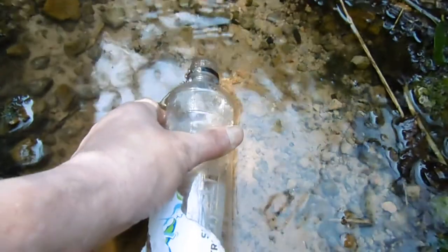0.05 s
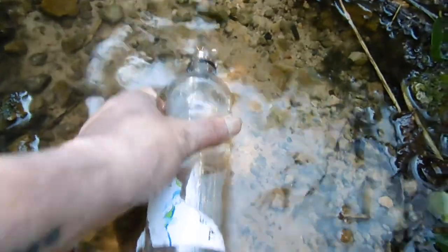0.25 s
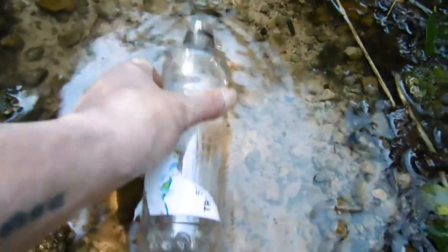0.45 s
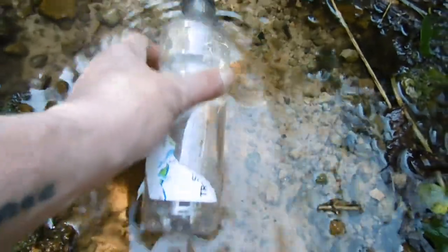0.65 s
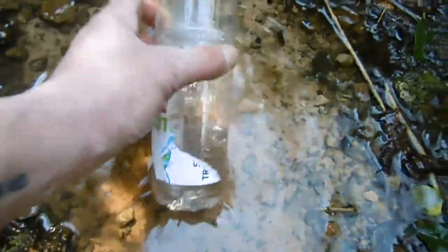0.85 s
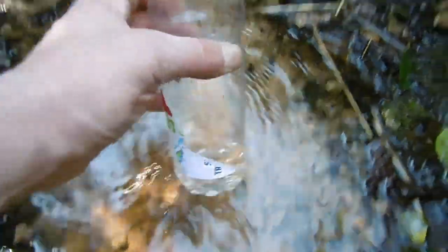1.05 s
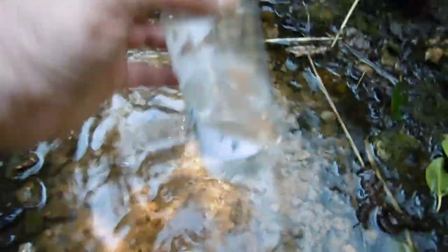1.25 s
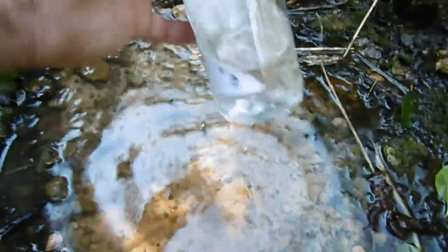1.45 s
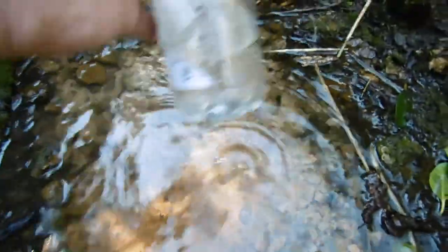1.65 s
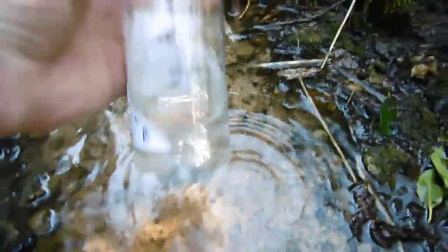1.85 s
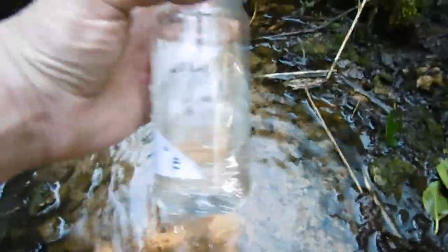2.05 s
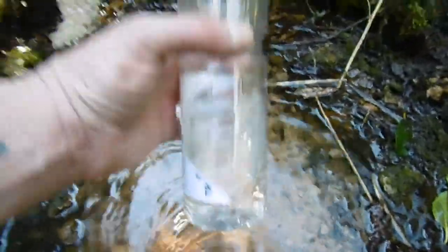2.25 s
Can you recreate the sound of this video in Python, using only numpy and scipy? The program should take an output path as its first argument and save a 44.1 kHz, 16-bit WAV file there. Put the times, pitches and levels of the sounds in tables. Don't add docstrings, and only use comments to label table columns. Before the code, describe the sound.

Water splashing in a plastic bottle: small bubbly spatters from 0.1 s, growing at 0.3 s, strongest at about 0.5-0.65 s as it leaves the stream, with hollow plops and slosh, a last splash at 0.8 s. Then quiet hiss and trickle, faint drips near 1 and 1.9 s. A distant bird whistles thinly from 0.9 s, busier after 1.9 s. Close, dull small microphone outdoors.

```python
import sys
import numpy as np
from scipy import signal
from scipy.fft import rfft, irfft
from scipy.io import wavfile
from scipy.ndimage import uniform_filter1d

SR = 44100
rng = np.random.default_rng(int(sys.argv[2]) if len(sys.argv) > 2 else 0)


def wav_out(sig):
    wavfile.write(sys.argv[1], SR, np.round(np.clip(np.atleast_2d(sig).T, -1, 1) * 32767).astype(np.int16))


def undo_db(level):
    steps = np.asarray(level, float) / 20
    return 10 ** steps


N = 99225


def evened(x):
    return x / np.sqrt(np.mean(x ** 2) + 1e-20)


def read(points, hz):
    point_hz, level_db = np.transpose(points)
    return np.interp(np.log(hz + 1), np.log(point_hz + 1), level_db)


def add(mix, start_s, sound):
    part = mix[round(start_s * SR):][:len(sound)]
    part += sound[:len(part)]


def bubble(hz, cycles, chirp):
    cycle = np.arange(1200) * hz / SR
    envelope = (1 - np.exp(-cycle / 0.43)) * np.exp(-3 * cycle / cycles)
    tone = envelope * np.sin(2 * np.pi * cycle * (1 + chirp * cycle / cycles))
    return tone / np.linalg.norm(tone)


def bubbles(colour, per_s, level_at, count=36):
    size_spread_db = 2.2
    out = np.zeros(N)
    for hz in np.geomspace(220, 8300, count):
        when, big = rng.random(N), rng.exponential(1, N)
        born = when < per_s / count / SR * np.sqrt(hz / 2000)
        train = born * undo_db(size_spread_db * np.minimum(big, 4))
        drive = evened(train - train.mean()) * level_at(hz) * np.sqrt(hz)
        ringing = signal.oaconvolve(drive, bubble(hz, cycles=5, chirp=0.07))[:N]
        out += undo_db(read(colour, hz)) * ringing
    return out


# pitch_hz [Hz], level_db [dB per Hz]
STREAM_SPECTRUM = [(12, -45.5), (24, -2), (55, -4.5), (158, -9), (198, -11), (421, -15.5), (465, -13.5),
                   (6700, -19), (8200, -23), (10700, -52), (18000, -120)]


def stream():
    hiss_db, trickle_db, patchy_db = -58, -70, 1.6
    frames, hz = N // 512 + 5, np.fft.rfftfreq(2048, 1 / SR)
    real, imaginary, patches = rng.standard_normal((frames, 1025, 3)).T
    patches = uniform_filter1d(patches, 24, 0)
    patches = evened(uniform_filter1d(patches, 5, 1))
    patches_db = patchy_db * patches * np.minimum(hz / 400, 1)[:, None]
    spectrum = (real + 1j * imaginary) * undo_db(read(STREAM_SPECTRUM, hz)[:, None] + patches_db)
    hiss = signal.istft(spectrum, nperseg=2048, noverlap=1536)[1][:N]
    trickle = bubbles(STREAM_SPECTRUM, per_s=1300, level_at=lambda hz: 1, count=20)
    return undo_db(hiss_db) * evened(hiss) + undo_db(trickle_db) * evened(trickle)


def resonate(x, hz, width_hz):
    turn = np.exp(2j * np.pi * np.cumsum(hz) / SR)
    pole = np.exp(-np.pi * width_hz / SR)
    return 2 * (turn * signal.lfilter([1 - pole], [1, -pole], x / turn)).real


# [dB, high bubbles]
SPLASHES = [(0.098, 0.033, -59.5, 7, 4.5), (0.116, 0.018, -51, -5.5, -1.5),
            (0.136, .03, -50.5, -1.5, 3.5), (0.167, 0.031, -50, 5.5, -2), (.192, .004, -46, 5, -5),
            (0.195, .026, -54.5, 2.5, -1), (0.225, 0.044, -50.5, 2.5, -6.5),
            (.259, .008, -48, -5, -4.5), (.267, 0.014, -44, 0, -3.5), (0.279, 0.0061, -42, -3, -1),
            (.285, .011, -39.5, 3, -1.5), (.296, 0.013, -42.5, 0, -1), (0.308, .004, -41.5, -6, 1),
            (.313, 0.017, -45, -1, -0.5), (0.328, 0.0061, -37, 0.5, -8),
            (.332, .006, -35.5, 1, -5.5), (.341, 0.0053, -34, -1, -3.5),
            (.346, 0.011, -45, 2.5, -9), (.363, 0.015, -43.5, 0, -5.5),
            (0.387, 0.023, -53.5, -7, -0.5), (0.409, .007, -52, -8, -2),
            (.416, .011, -45.5, -10, -2), (0.434, 0.025, -44.5, -4.5, -9),
            (0.445, 0.027, -43, 3, -2),
            (0.481, 0.018, -41.5, -2.5, -7), (0.493, .003, -35, -3, -2.5),
                    (0.495, 0.012, -32, -4.5, -3.5), (.506, .009, -35, -3.5, -4),
                    (0.517, 0.033, -44.5, 5, -4), (0.543, 0.01, -39, -8, 1.5), (.56, 0.0057, -36.5, -3, 4),
                    (.565, 0.0082, -43.5, 2, -2), (.572, 0.0068, -38, -0.5, 1),
                    (0.58, 0.013, -38.5, 3, -3.5), (0.59, 0.021, -36, -0.5, -6),
                    (0.608, .011, -41.5, 6, -3), (.621, .005, -34, 1, -5.5), (0.625, .006, -40, 3.5, -3),
                    (.632, 0.0078, -37, 2, -4.5), (0.64, 0.014, -40, 1, -5), (.653, .015, -50, 5, -3),
                    (.668, 0.0093, -40, -4, 1), (.683, 0.0065, -40.5, -7, -2), (.689, .007, -43.5, -4, -4),
                    (.696, 0.022, -54, 2.5, -3), (0.7194, 0.0049, -45.5, 1.5, 6.5),
                    (0.746, 0.0093, -46, 1, -9), (.759, .006, -44, -3, -3.5), (0.766, .032, -50.5, -10, -2),
                    (0.7988, .004, -36, -3.5, 0), (0.8028, .005, -40.5, -3, 1.5),
                    (.809, .013, -43, 2, -3.5), (0.82, 0.0073, -52.5, 7, -6), (0.964, 0.03, -60.5, 2, 3),
                    (1.068, 0.022, -57.5, 1, 8.5), (1.899, .004, -49, -13, -20),
                    (1.902, 0.0093, -49, -10, -20), (1.91, .008, -54.5, -15, -14),
                    (1.935, .055, -57, -18, -5)]
# pitch_hz [Hz], level_db [dB per Hz]
SPRAY_SPECTRUM = [(150, -47.5), (250, -25.5), (550, -11.5), (1400, -5), (1960, -9.5), (2600, -3.5),
                  (6980, -8.5), (8200, -38), (10700, -58.5), (18000, -120)]
# time_s [s], pitch_hz [Hz]
NECK_PITCH = [
    (0, 2660),
    (.33, 2260),
    (.42, 2050),
    (.55, 2074),
    (.7, 1985),
    (.85, 1800),
]
# pitch_hz [Hz], width_hz [Hz], level_db [dB]
WALL_MODES = [(235, 40, 8), (450, 60, 1), (545, 50, 3), (1005, 50, -3), (4900, 250, -3), (6880, 200, 3),
              (7500, 200, 2)]


def splashes():
    rise_s, sag_db, release_db_per_s = 0.003, -1.5, 3500
    clump_db, clump_s = 1.2, 0.0012
    gulp_below_hz, fizz_above_hz = 1700, 4700
    power = np.zeros((N, 3))
    for start_s, length_s, level_db, gulp_db, fizz_db in SPLASHES:
        t = np.arange(0, length_s + 0.04, 1 / SR)
        sag = sag_db * np.minimum(t / length_s, 1)
        release = release_db_per_s * np.maximum(t - length_s, 0)
        envelope = np.minimum(t / rise_s, 1) * undo_db(level_db + sag - release)
        band_gains = undo_db(np.array([gulp_db, 0, fizz_db]))
        add(power, start_s - rise_s / 2, (envelope[:, None] * band_gains) ** 2)
    clump = np.exp(-(np.arange(-400, 400) / SR / clump_s) ** 2)
    clumps = evened(signal.oaconvolve(rng.standard_normal(N), clump, "same"))
    gulp, body, fizz = np.sqrt(power.T) * undo_db(clump_db * clumps)

    def level_at(hz):
        if hz < gulp_below_hz:
            return gulp
        return fizz if hz > fizz_above_hz else body

    spray = undo_db(-45.0) * bubbles(SPRAY_SPECTRUM, per_s=24000, level_at=level_at)
    wall = np.zeros(N)
    for hz, width_hz, level_db in WALL_MODES:
        wall += undo_db(level_db) * signal.lfilter(*signal.iirpeak(hz, hz / width_hz, SR), spray)
    neck_hz = np.interp(np.arange(N) / SR, *np.transpose(NECK_PITCH))
    neck = undo_db(4.5) * resonate(spray, neck_hz, width_hz=170)
    overtone = undo_db(-3.5) * resonate(spray, 1.9 * neck_hz, width_hz=450)
    return spray + wall + neck + overtone


# start_s [s], peak_db [dB], pitch_hz [Hz], t60_s [s]
LARGE_BUBBLES = [(0.17, -41, 3600, .012), (.288, -38.5, 118.4, 0.091), (.3412, -26, 2420, 0.015),
                 (0.3409, -25, 960, 0.011), (.341, -30, 4700, 0.011), (.4872, -28.5, 1700, 0.0089),
                 (.4922, -24, 2150, 0.01), (0.5618, -26.5, 1990, 0.016), (.6209, -22.5, 1990, 0.014),
                 (.6207, -26.5, 4000, 0.011), (.6207, -29, 3900, 0.012), (0.62, -35, 1870, .04),
                 (.9765, -41, 3900, 0.012), (1.2137, -45.5, 7380, 0.017), (1.504, -50, 3370, 0.017),
                 (.4995, -19, 2310, 0.0051), (.6215, -35, 460, .045), (0.5125, -34.5, 2200, 0.025),
                 (0.547, -35.5, 1985, 0.044), (0.61, -49, 7060, .015), (0.53, -37.5, 8100, 0.006),
                 (.5945, -36, 4000, 0.018), (.684, -34.5, 1850, .02), (.284, -32, 7200, 0.0064),
                 (.143, -45, 2900, .022), (.824, -56, 1288, 0.19), (1.086, -56, 5070, .02),
                 (.5735, -34.5, 562, 0.036), (.592, -35, 482, .035), (.447, -39.5, 607, 0.029),
                 (.5535, -34, 2000, 0.011), (0.46, -29, 4160, 0.014), (.501, -37, 1290, 0.042),
                 (.5605, -35, 6900, .008), (.2852, -33, 2530, .01), (0.31, -36.5, 4600, 0.0071),
                 (.3708, -37.5, 3500, 0.0047), (.267, -39, 1050, 0.031), (0.66, -34, 2000, .015),
                 (.808, -39, 1176, .02), (0.7, -45.5, 6750, 0.017), (.8, -38, 2800, .015),
                 (1.6, -48, 28, 0.18), (.634, -43, 7900, .015), (0.26, -46, 720, .03),
                 (.288, -45, 300, 0.013), (.69, -52.5, 240, .13), (.82, -52.5, 245, .12),
                 (.605, -47, 225, 0.11), (2.1, -47, 2600, .008)]


def plops():
    rise_cycles = 1.28
    out, t = np.zeros(N), np.arange(6000) / SR
    for start_s, peak_db, hz, t60_s in LARGE_BUBBLES:
        rise = np.minimum(t * hz / rise_cycles, 1) ** 2
        decay = undo_db(peak_db - 60 * t / t60_s)
        add(out, start_s, rise * decay * np.sin(2 * np.pi * hz * t))
    return out


def echo(x, t60_s, delay_s):
    t = np.arange(SR // 2) / SR
    tail = rng.standard_normal(len(t)) * undo_db(-60 * t / t60_s) * (t > delay_s)
    return signal.fftconvolve(x, tail / np.linalg.norm(tail))[:N]


# start_s [s], length_s [s], level_db [dB], first_hz [Hz], last_hz [Hz]
BIRD_NOTES = [(0.871, 0.067, -71, 5200, 4670), (0.996, 0.027, -63, 7670, 6970),
              (1.04, .05, -79, 7630, 6850), (1.09, 0.031, -60.5, 5810, 6430),
              (1.14, 0.043, -68.5, 6280, 5720), (1.48, .02, -60, 5100, 4950), (1.5, 0.055, -67, 4830, 4260),
              (1.505, 0.038, -67, 5150, 4930), (1.595, .045, -64.5, 6210, 6200),
              (1.635, 0.041, -61, 6340, 6310), (1.662, 0.037, -67.5, 5770, 5780),
              (1.715, 0.03, -70, 5790, 5770), (1.889, .05, -66, 7750, 7380),
              (1.939, 0.047, -62.5, 6020, 5960), (1.942, .018, -60, 5890, 4500),
              (1.957, 0.03, -60.5, 4500, 4840), (1.985, .035, -63, 4890, 5530),
              (1.991, 0.0604, -65.5, 4480, 4820), (2.08, 0.018, -61.5, 7970, 6980),
              (2.1, 0.044, -68, 7730, 7530), (2.12, 0.038, -67.5, 7100, 7300),
              (2.147, .075, -63.5, 5960, 5900), (2.155, 0.022, -62, 5840, 4530),
              (2.166, .04, -62.5, 4393, 4650), (2.185, .06, -62, 4750, 5590),
              (2.21, 0.043, -68, 4400, 4610)]


def bird():
    warble_hz, warble_share, edge_s, fade_db = 65, 0.17, 0.004, -5
    out = np.zeros(N)
    for start_s, length_s, level_db, first_hz, last_hz in BIRD_NOTES:
        t = np.arange(0, length_s, 1 / SR)
        glide_hz = last_hz - first_hz
        wobble = evened(uniform_filter1d(rng.standard_normal(8000), size=100))[:len(t)]
        depth_hz = warble_hz + warble_share * abs(glide_hz)
        hz = first_hz + glide_hz * t / length_s + depth_hz * wobble
        edge = np.clip(np.minimum(t, length_s - t) / edge_s, 0, 1)
        level = np.sqrt(2) * undo_db(level_db + fade_db * (t / length_s - 0.5))
        add(out, start_s, level * edge * np.sin(2 * np.pi * np.cumsum(hz) / SR))
    return out + undo_db(2.5) * echo(out, t60_s=0.36, delay_s=0.004)


def scene():
    near = splashes() + plops()
    bank = undo_db(-17) * echo(near, t60_s=0.07, delay_s=0.0026)
    return (near + bank + bird() + stream())[None]


def band_limit(x):
    return signal.sosfilt(signal.butter(12, 8390, fs=SR, output="sos"), x)


def record(dry):
    edge_hz, edge_soft_hz = 7930, 1630
    hz = np.fft.rfftfreq(N, 1 / SR)
    past_edge = np.clip((hz - edge_hz) / edge_soft_hz + 0.5, 0, 3)
    band = irfft(rfft(dry) * undo_db(-30 * past_edge ** 2), N)
    return band_limit(band)


dry = scene()
out = record(dry)
wav_out(out)
```